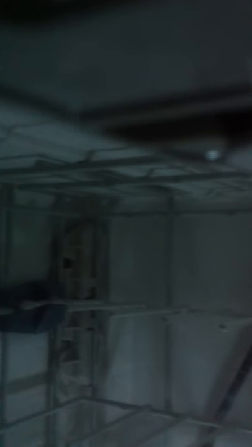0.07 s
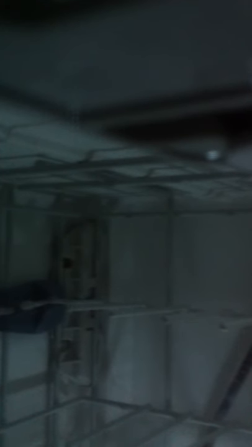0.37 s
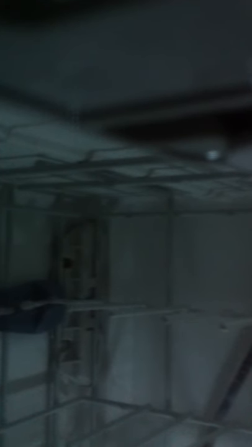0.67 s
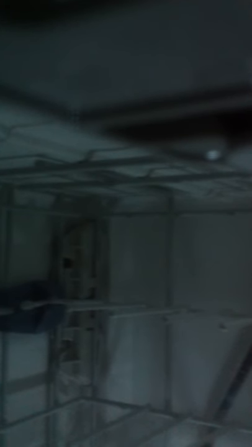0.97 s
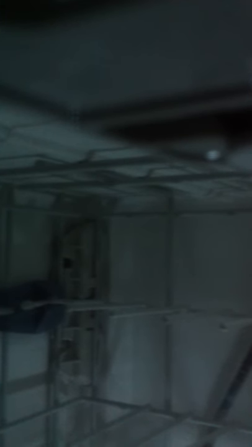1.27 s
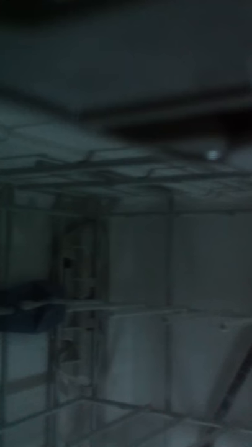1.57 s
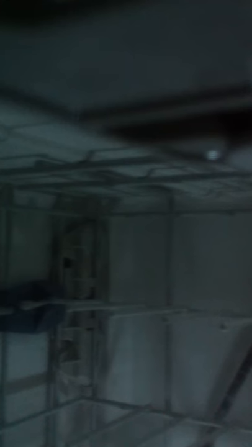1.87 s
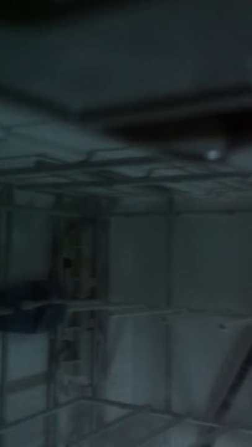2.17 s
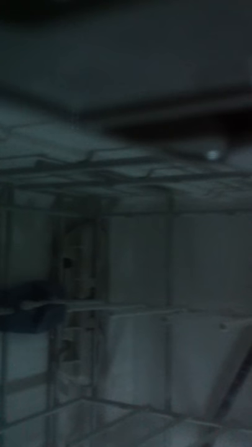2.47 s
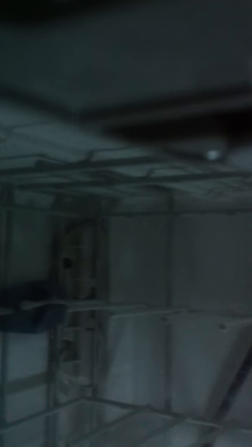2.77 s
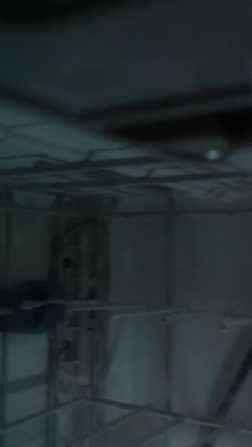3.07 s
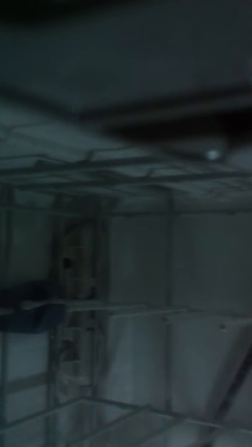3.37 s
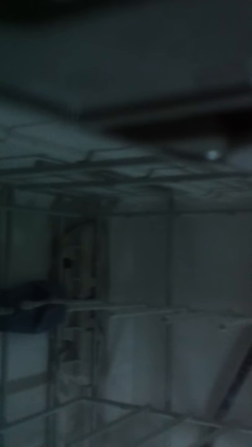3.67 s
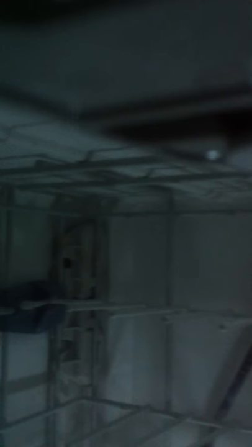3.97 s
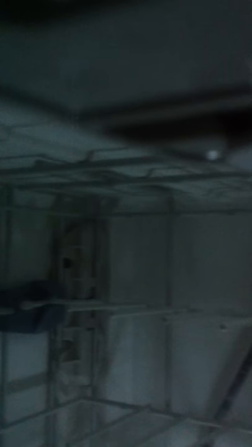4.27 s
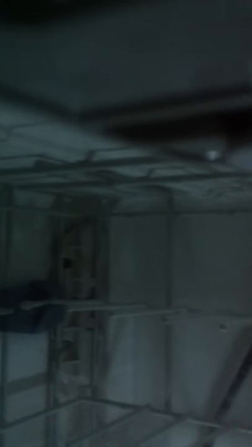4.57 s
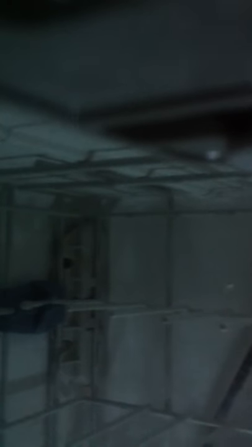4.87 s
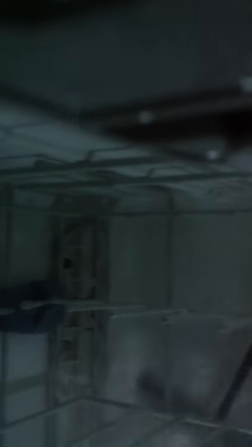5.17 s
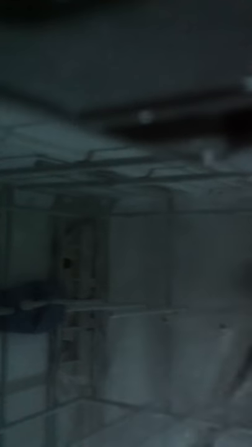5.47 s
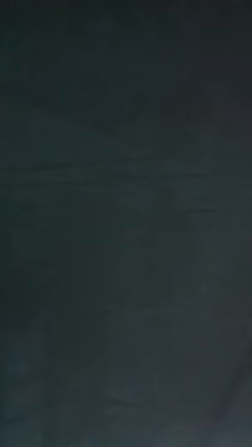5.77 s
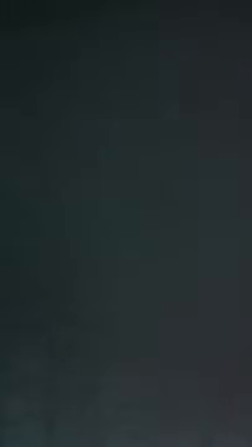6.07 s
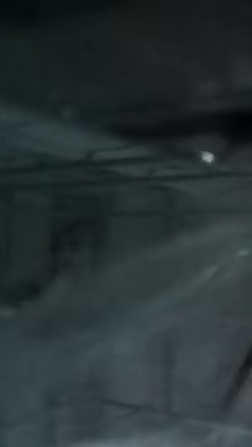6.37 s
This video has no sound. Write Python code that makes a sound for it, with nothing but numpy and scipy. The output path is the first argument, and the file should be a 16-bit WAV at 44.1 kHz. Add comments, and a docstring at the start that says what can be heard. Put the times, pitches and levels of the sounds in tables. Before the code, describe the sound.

Heard from inside a closed dishwasher, a faint electrical hum and dull room noise sit under a few small drips and a tiny rack creak. About four seconds in, the pump kicks on and the spray arms spit, then break into a loud, continuous rush. Water hisses, rings the steel tub, sizzles across the wire rack and thuds on the panels, with a deep churn building at the end.

```python
"""Inside a closed dishwasher. First a faint mains hum and kitchen noise through the door, with a few
drips and a creak of the rack. At 4.15 s the wash pump surges and the arms spit air and water.
Then jets sweep the tub: dense drops hiss, ring the steel and drum on the panels, slugs of water thud,
and near 5 s a hard jet sizzles on the wire rack. Toward the end a deep churn grows in the sump."""
import sys
import numpy as np
from scipy import signal
from scipy.fft import rfft, irfft
from scipy.io import wavfile
from scipy.ndimage import uniform_filter1d

SR = 44100
rng = np.random.default_rng(int(sys.argv[2]) if len(sys.argv) > 2 else 0)


def output_pcm(signal):
    """Save a mono or channel-first signal as 16-bit PCM at the path in sys.argv[1].

    Samples are clipped to [-1, 1] before scaling.
    """
    pcm = np.clip(np.atleast_2d(signal).T, -1, 1) * 32767
    wavfile.write(sys.argv[1], SR, np.round(pcm).astype(np.int16))


N = 287091
TIME = np.arange(N) / SR
FREQ_HZ = np.fft.rfftfreq(N, 1 / SR)


def undb(db):
    """Decibels to gain."""
    return 10 ** (np.asarray(db) / 20)


def level(x, db=0):
    """Scale to an rms level."""
    return x * undb(db) / np.sqrt(np.mean(x ** 2))


def curve(rows, column=1, before=None):
    """One table column, linear in time between rows."""
    rows = np.array(rows, float)
    return np.interp(TIME, rows[:, 0], rows[:, column], left=before)


def band(x, low_hz, high_hz, order=2):
    """Butterworth band-pass."""
    return signal.sosfilt(signal.butter(order, [low_hz, high_hz], "bandpass", fs=SR, output="sos"), x)


def colour(x, spectrum):
    """Filter by (f/Hz, level/dB) points."""
    hz, db = np.transpose(spectrum)
    return irfft(rfft(x) * undb(np.interp(np.log(FREQ_HZ + 1), np.log(hz), db)), N)


def ring(x, modes):
    """Drive parallel resonators (f/Hz, width/Hz, level/dB)."""
    return sum(undb(db) * signal.lfilter(*signal.iirpeak(hz, hz / width, fs=SR), x)
               for hz, width, db in modes)


def walk(rate_hz):
    """Random steps, smoothed twice; spread near 1."""
    hold = int(SR / rate_hz)
    steps = np.repeat(rng.standard_normal(N // hold + 1), hold)
    return 1.63 * uniform_filter1d(uniform_filter1d(steps, hold), hold)[:N]


def drops(per_s, spread_db):
    """Random impacts, many small, few large; same mean power at any rate."""
    chance = np.clip(per_s / SR, 1e-4, 1) * np.ones(N)
    hits = np.flatnonzero(rng.random(N) < chance)
    size = undb(spread_db * np.minimum(rng.exponential(size=N)[hits], 5))
    out = np.zeros(N)
    out[hits] = size * rng.standard_normal(N)[hits] / np.sqrt(chance[hits])
    return level(out)


def steady(x, window_s):
    """Divide by the running rms: swells go, grain stays."""
    return x / np.sqrt(uniform_filter1d(x ** 2, int(window_s * SR)) + 1e-12)


def swell(start_s, length_s, attack_s, release_s):
    """Linear rise, hold, exponential decay."""
    age = TIME - start_s
    return np.clip(age / attack_s, 0, 1) * np.exp(-np.maximum(age - length_s, 0) / release_s)


def powers(events, attack_s, release_s):
    """Power envelope of each (t/s, length/s, level/dB) event."""
    return np.array([(undb(db) * swell(t, length, attack_s, release_s)) ** 2
                     for t, length, db, *_ in events])


# kitchen spectrum through the door: f/Hz, level/dB
KITCHEN_SPECTRUM = [(20, -32), (50, -28), (90, -16), (125, 2.5), (180, -1), (240, -1.5), (330, 0.5),
                    (390, -14), (560, -17.5), (900, -17), (1400, -22.5), (4000, -24), (9000, -26.5),
                    (15500, -26)]
# tub cavity modes: f/Hz, width/Hz, level/dB
CAVITY_MODES = [(693, 21, 3.5), (777, 11, 4), (904, 35, -1.5), (1015, 20, -20), (1175, 8.6, -3.5)]
def kitchen():
    """Dull room noise leaks in and sounds the hollow of the tub."""
    room = level(colour(rng.standard_normal(N), KITCHEN_SPECTRUM), db=-63.5)
    cavity = level(ring(rng.standard_normal(N), CAVITY_MODES), db=-77.5)
    return room + cavity * undb(1.5 * walk(4.26))


# mains hum: harmonic, level/dB, growth/(dB/s)
HUM_PARTIALS = [(1, -92, -0.5), (2, -73, -0.36), (4, -74.5, 2)]
def motor(mains_hz=61, start_s=4.15, rise_s=0.096, pump_db=-36.5, surge_db=10):
    """Faint mains hum; the pump surges as it primes, settles and throbs at twice the mains rate."""
    phase = 2 * np.pi * np.cumsum(mains_hz * (1 + 0.0032 * walk(4.93))) / SR
    hum = sum(np.sin(k * phase) * undb(db + growth * TIME + 0.37 * walk(3.45))
              for k, db, growth in HUM_PARTIALS)
    running = np.clip((TIME - start_s) / rise_s, 0, 1)
    surge = swell(start_s, rise_s, rise_s, release_s=0.046)
    pump = np.sin(2 * phase) * running * undb(pump_db + surge_db * surge + 2 * walk(27))
    return np.sqrt(2) * (hum + pump)


# wire rack modes; wall and door panel modes: f/Hz, width/Hz, level/dB
RACK_MODES = [(680, 40, -7), (2220, 54, -4), (2450, 90, 2), (3200, 440, -12), (4270, 200, -14)]
PANEL_MODES = [(122, 16, -9), (162, 26, 1.2), (204, 20, 2.8), (246, 40, -3), (298, 45, -4), (365, 26, 0),
               (425, 40, -9.5), (486, 30, -7)]
# rack creak; cabinet shifts: t/s, length/s, level/dB
RACK_CREAK = [(2.279, 0.022, -59.5)]
CABINET_SHIFTS = [(1.96, 0.17, -65), (2.277, 0.047, -56), (2.36, .05, -67), (2.77, 0.014, -60.5)]
def creak():
    """Quick slips ring the wire rack; the cabinet shifts and rumbles softly."""
    rack = level(band(ring(drops(2500, 1), RACK_MODES), 500, 5600, order=3))
    cabinet = level(band(ring(drops(900, 0.85), PANEL_MODES), 140, 380))
    rack_power = powers(RACK_CREAK, attack_s=0.002, release_s=0.017).sum(axis=0)
    cabinet_power = powers(CABINET_SHIFTS, attack_s=0.002, release_s=0.04).sum(axis=0)
    return rack * np.sqrt(rack_power) + cabinet * np.sqrt(cabinet_power)


# drips and small knocks: t/s, level/dB, f/Hz, t60/s, splatter/0-1, tick level/dB
DRIP_HITS = [(.574, -51, 970, 0.13, 0.45, -75), (.596, -52, 12000, .003, 0.9, -46),
             (.887, -51, 4830, .005, 0.2, -48), (2.096, -52, 420, 0.1, 1, -75),
             (2.461, -26.5, 725, 0.0053, 0.32, -70), (2.462, -38, 260, .02, 0.36, -80),
             (2.639, -55, 3000, 0.03, 0.7, -44), (2.77, -52, 2600, 0.011, 0.7, -58),
             (2.771, -43.5, 332, 0.027, 0.75, -75), (3.21, -46.5, 775, 0.0072, 0.1, -49),
             (3.246, -58, 180, .05, 0.4, -80), (3.611, -51, 480, 0.12, 1, -75)]
def drips(tick_t60_s=0.004):
    """A contact tick, then a damped ring of whatever was hit, roughened by splatter."""
    out, age = np.zeros(N), TIME[:SR // 6]
    for t, db, hz, t60, splatter, tick_db in DRIP_HITS:
        rough = level(band(rng.standard_normal(len(age)), hz / 2.6, hz * 1.07))
        swing = (1 - splatter) * np.sin(2 * np.pi * hz * age) + splatter * rough
        onset = (1 - np.exp(-age * hz / 0.36)) ** 2
        plop = swing * onset * undb(-60 * age / t60)
        tick = rng.standard_normal(len(age)) * undb(-60 * age / tick_t60_s)
        drip = undb(db) * plop / np.abs(plop).max() + undb(tick_db) * tick / np.abs(tick).max()
        start = int(t * SR)
        out[start:start + len(age)] += drip
    return band(out, 160, 16000)


# water slugs on a panel: t/s, peak level/dB, contact/s
SLUG_HITS = [(4.914, -8.5, 0.0024), (5.295, -4, 0.0059), (5.301, -7.5, 0.004), (5.7, -8.5, 0.0018),
             (5.736, -3, 0.00021), (6.064, -10.5, 0.00052)]
def slaps(t60_s=0.16):
    """A slug of water pushes a panel once; shorter contact, brighter thud."""
    out, age = np.zeros(N), TIME[:SR // 6]
    for t, db, contact_s in SLUG_HITS:
        push = age / contact_s * np.exp(-np.pi * age / contact_s)
        thud = band(ring(push, PANEL_MODES), 131, 5000, order=3) * undb(-60 * age / t60_s)
        start = int(t * SR)
        out[start:start + len(age)] += undb(db) * thud / np.abs(thud).max()
    return out


# sump churn: t/s, level/dB
SUMP_CHURN = [(4.2, -61), (5.7, -64), (6.2, -52), (6.43, -36), (6.51, -40)]
def churn(flow_per_s):
    """Water churns deep in the sump."""
    rumble = steady(band(drops(flow_per_s / 6, 1.5), 65, 94), window_s=0.1)
    return rumble * undb(curve(SUMP_CHURN, before=-150))


# sump spectrum: f/Hz, level/dB
SUMP_SPECTRUM = [(20, -29), (50, -26), (75, -14), (110, -16), (170, 4), (350, 0), (600, -9), (1200, -11),
                 (4000, -80)]
def sump_rumble(flow_per_s):
    """Dull water impacts in the sump, unit rms."""
    return level(colour(drops(flow_per_s / 6, 1.5), SUMP_SPECTRUM))


# steady wash: t/s, drumming level/dB, tub level/dB, rumble re panels/dB, bass tilt/(dB/octave)
WASH_LEVELS = [(4.153, -49, -52, -9, 8), (4.215, -32.5, -36.5, -5, -.5), (4.3, -23.3, -23, -14, -0.5),
               (4.42, -28.5, -33.5, -3, -1), (4.6, -29, -25, -4, -4.5), (4.8, -27.5, -22, -5.5, 0.5),
               (5.38, -23, -29, -14, 2.5), (5.8, -23.5, -26.5, -6, 0.5), (6.51, -20.5, -23.5, -3.5, -0.5)]
# jets crossing a panel: t/s, length/s, level/dB
SWEEPS = [(4.62, 0.018, -21), (4.745, 0.092, -16), (4.895, 0.095, -17.5), (5.16, 0.097, -18.5),
          (5.27, 0.046, -15.5), (5.46, 0.084, -17), (5.635, 0.053, -17.5), (5.69, 0.012, -15),
          (5.99, 0.094, -19), (6.265, 0.092, -19)]
def drumming(flow_per_s):
    """Water drums on the thin panels and rumbles in the sump; the drumming's depth shifts over time."""
    tilt_db = curve(WASH_LEVELS, column=4)
    panels = sum(ring(drops(flow_per_s / 6, 0.95), [mode]) * undb(tilt_db * np.log2(260 / mode[0]))
                 for mode in PANEL_MODES)
    rumble = sump_rumble(flow_per_s) * undb(curve(WASH_LEVELS, column=3))
    thrum = level(band(panels, 115, 670, order=3)) + rumble
    wash_power = undb(curve(WASH_LEVELS, before=-150)) ** 2
    sweep_power = powers(SWEEPS, attack_s=0.0085, release_s=0.049).sum(axis=0)
    return steady(thrum, window_s=0.0302) * np.sqrt(wash_power + sweep_power)


# steel tub modes: f/Hz, width/Hz, level/dB
TUB_MODES = [(545, 40, -1.5), (628, 32, 1), (683, 20, 4), (715, 20, -1), (779, 14, 4), (841, 16, 2),
             (935, 50, -4.5), (1002, 24, 2.5), (1062, 14, -3.5), (1187, 26, -.5), (1260, 16, 1),
             (1330, 42, 0), (1380, 20, -1.5), (1444, 14, -3), (1587, 30, -5), (1745, 22, -1),
             (1830, 40, -8), (1928, 38, -2), (1990, 60, -8), (2200, 80, -9), (2361, 32, -4), (2486, 32, -4),
             (2682, 43, -5)]
# jets striking the tub: t/s, length/s, level/dB, favoured f/Hz
STRIKES = [(4.25, 0.024, -17.5, 640), (4.286, 0.041, -28.5, 1650), (4.614, 0.058, -16, 1240),
           (4.792, 0.029, -17.5, 1300), (4.867, 0.03, -15, 1430), (5.179, 0.12, -23, 900),
           (5.462, 0.048, -28, 670), (5.688, 0.012, -24, 670), (6.337, 0.017, -19.5, 710),
           (6.502, 0.028, -30, 840)]
def tub_ringing(flow_per_s, centre_hz=835, favour_db=6, favour_width_oct=0.24):
    """Drops ring the tub; the spot struck favours modes near one pitch, higher at fuller flow."""
    wash_power = undb(curve(WASH_LEVELS, column=2, before=-150)) ** 2
    strike_powers = powers(STRIKES, attack_s=0.012, release_s=0.006)
    power = wash_power + strike_powers.sum(axis=0)
    wash_oct = np.log2(centre_hz) + 0.23 * np.log2(flow_per_s / 4500) + 0.22 * walk(12)
    strike_oct = np.log2([hz for *_, hz in STRIKES])
    favoured_oct = (wash_power * wash_oct + strike_oct @ strike_powers) / power
    streams = [drops(flow_per_s / 2, 2) for _ in range(4)]
    tub = np.zeros(N)
    for k, mode in enumerate(TUB_MODES):
        nearness = np.exp(-((np.log2(mode[0]) - favoured_oct) / favour_width_oct) ** 2)
        tub += ring(streams[k % len(streams)], [mode]) * undb(favour_db * nearness + 2 * walk(14))
    return steady(band(tub, 400, 2750), window_s=0.043) * np.sqrt(power)


# rack wires under a jet: f/Hz, width/Hz, level/dB
SIZZLE_MODES = [(3480, 65, -1), (4200, 660, -2.5), (4550, 240, -4.5), (4790, 57, 0.5), (4960, 140, 2),
                (5270, 140, 3.5), (7050, 220, -2)]
def rack_sizzle(flow_per_s, splash_db, pass_s=5.08, half_width_s=0.17, depth_db=10.5):
    """Drops sizzle on the wire rack, rising to the splash level as a hard jet crosses it."""
    wires = sum(ring(drops(flow_per_s / 3, 1.8), [mode]) * undb(1.5 * walk(17)) for mode in SIZZLE_MODES)
    on_rack = np.exp(-((TIME - pass_s) / half_width_s) ** 2)
    return level(band(wires, 2100, 8000)) * undb(splash_db + depth_db * (on_rack - 1))


def spurts(per_s=30, decay_s=0.0097, kick_db=1.76):
    """Gain of a jet breaking into quick spurts; mean delivery stays even."""
    kicks = (rng.random(N) < per_s / SR) * rng.uniform(0.5, 2, N)
    surge = signal.lfilter([1], [1, -np.exp(-1 / (decay_s * SR))], kicks)
    return steady(undb(kick_db * np.minimum(surge, 2)), window_s=0.067)


def gusty(steady_db, gusts):
    """Gain of a steady spray plus short gusts."""
    return np.sqrt(undb(steady_db) ** 2 + powers(gusts, attack_s=0.011, release_s=0.013).sum(axis=0))


# splash and fine mist spectra: f/Hz, level/dB
SPLASH_SPECTRUM = [(150, -50), (500, -32), (1200, 4), (2200, 2), (3300, 3), (4000, 1), (5300, -2),
                   (6100, -10), (7500, -14), (9500, -15.5), (15000, -21.5)]
MIST_SPECTRUM = [(3000, -51), (6000, -0.5), (8000, -2), (9300, -2.5), (10800, -0.5), (12400, -3),
                 (13400, -2), (15700, -8)]
# air leaving the nozzles: t/s, length/s, level/dB
NOZZLE_PUFF = [(4.153, 0.014, -58)]
# spray thrown close by: t/s, length/s, splash level/dB, mist level/dB
SPRAY_GUSTS = [(4.472, 0.038, -25, -25), (4.65, 0.018, -27.5, -21.5), (4.774, 0.052, -27, -24.5),
               (4.87, 0.038, -26, -24.5), (5.101, 0.06, -40, -24), (5.212, .05, -26, -24.5),
               (5.666, 0.028, -33, -28), (6.054, 0.026, -23.5, -36), (6.161, 0.027, -26, -27),
               (6.233, 0.021, -25.5, -27)]
def spray(flow_per_s, splash_db, fizz_s=0.012, primed_s=4.485, priming_s=0.012):
    """Drops burst and fizz into splash and mist; the mist fills in once the air is out of the arms."""
    impacts = drops(flow_per_s, 2.5)
    fade = np.exp(-1 / (fizz_s * SR))
    fizz = np.sqrt(signal.lfilter([1 - fade], [1, -fade], impacts ** 2)) * rng.standard_normal(N)
    burst = (impacts + undb(4) * fizz) * spurts()
    primed = np.clip((TIME - primed_s) / priming_s + 0.5, 0, 1)
    primed_offset_db = -2 - 0.5 * (splash_db + 25)  # a heavy splash is coarser
    mist_db = splash_db + primed * primed_offset_db - 13.5 * (1 - primed)
    mist_gusts = NOZZLE_PUFF + [(t, length, db) for t, length, _, db in SPRAY_GUSTS]
    splash = level(colour(burst, SPLASH_SPECTRUM), db=-0.82) * undb(0.82 * walk(45))
    mist = level(colour(burst, MIST_SPECTRUM), db=-1.2) * undb(0.87 * walk(25))
    return splash * gusty(splash_db, SPRAY_GUSTS) + mist * gusty(mist_db, mist_gusts)


# the arms spit, fill, then turn their spray away: t/s, drop rate/(1/s), splash level/dB
ARM_FLOW = [(4.153, 3700, -68), (4.23, 2200, -57), (4.25, 2300, -29), (4.285, 1830, -24.5),
            (4.4, 1770, -35), (4.455, 4000, -27), (4.495, 12800, -21), (4.7, 12400, -20),
            (4.87, 11100, -21.5), (4.96, 11700, -24.5), (5.295, 11400, -24.3), (5.318, 4000, -30.5),
            (5.52, 4500, -27), (5.75, 4470, -29.5), (6.03, 4440, -26.7), (6.51, 4640, -27)]
def jets():
    """One flow of water drives panels, sump, tub, spray and rack."""
    flow_per_s = curve(ARM_FLOW)
    splash_db = curve(ARM_FLOW, column=2, before=-150)
    body = drumming(flow_per_s) + churn(flow_per_s) + tub_ringing(flow_per_s)
    return body + spray(flow_per_s, splash_db) + rack_sizzle(flow_per_s, splash_db)


def scene():
    """Mono mix at one point inside the tub."""
    return (jets() + slaps() + drips() + creak() + motor() + kitchen())[None]


def record(dry, ceiling=0.9, top_hz=15700):
    """Soft peak limit, then a steep low-pass."""
    rounded = dry / (1 + (dry / ceiling) ** 4) ** (1 / 4)
    return signal.sosfilt(signal.ellip(14, 0.2, 90, top_hz, fs=SR, output="sos"), rounded)


dry = scene()
out = record(dry)
output_pcm(out)
```